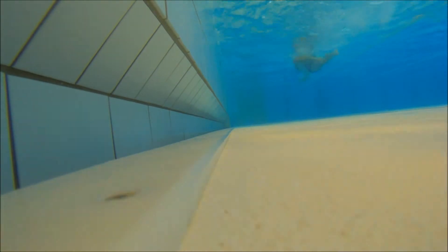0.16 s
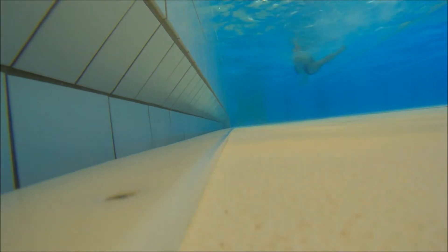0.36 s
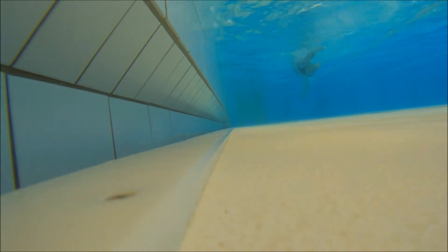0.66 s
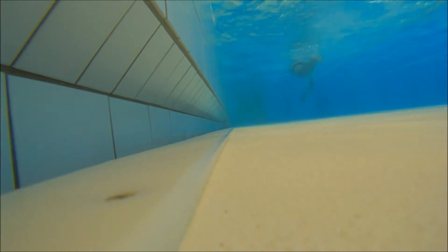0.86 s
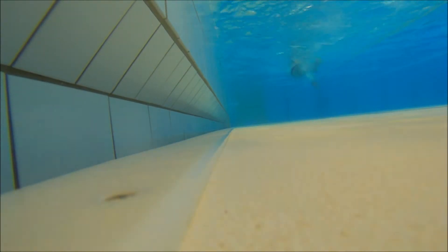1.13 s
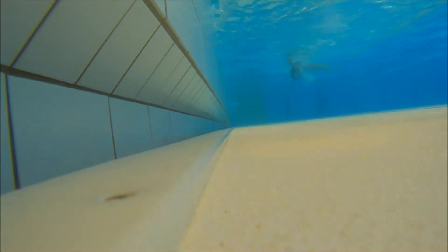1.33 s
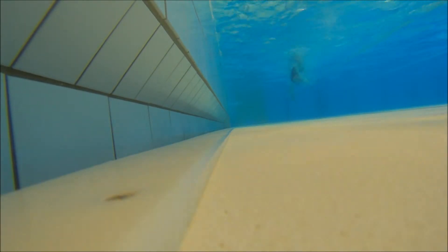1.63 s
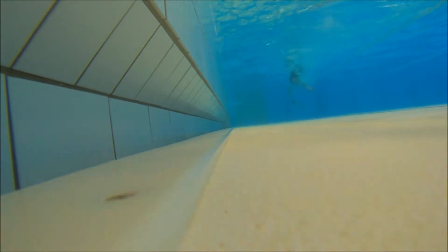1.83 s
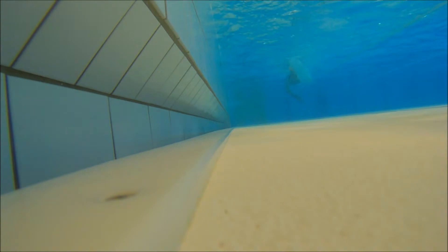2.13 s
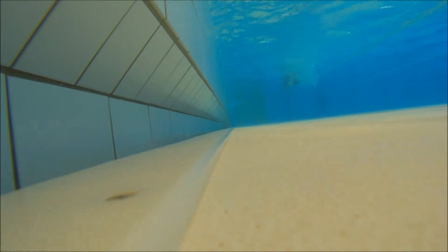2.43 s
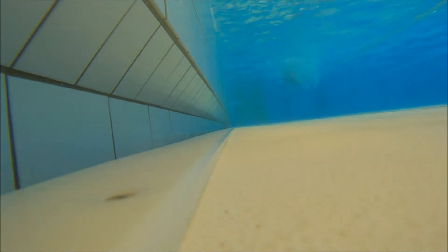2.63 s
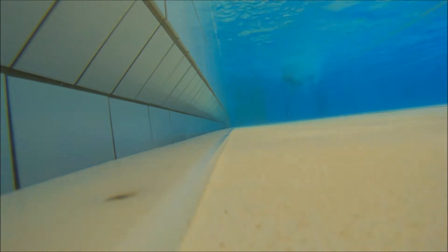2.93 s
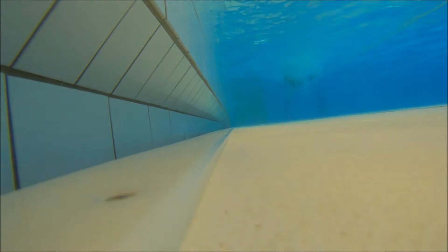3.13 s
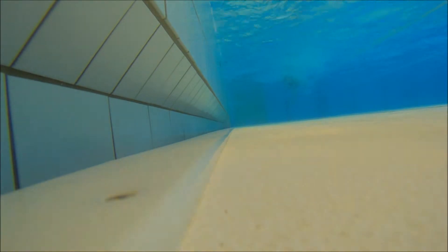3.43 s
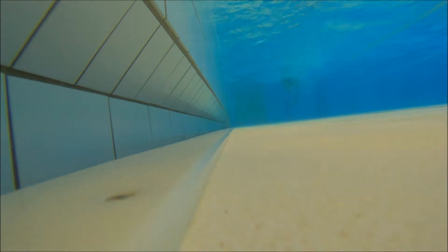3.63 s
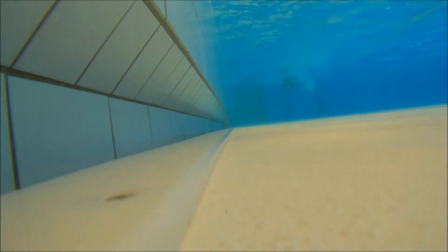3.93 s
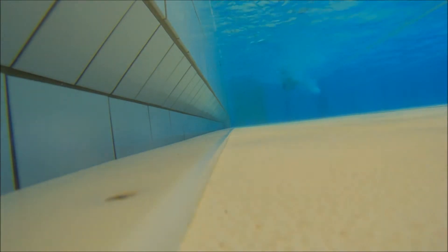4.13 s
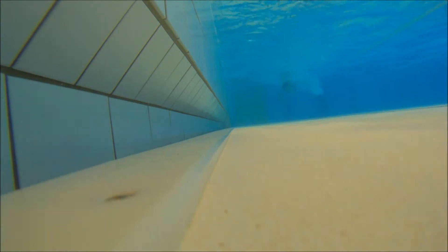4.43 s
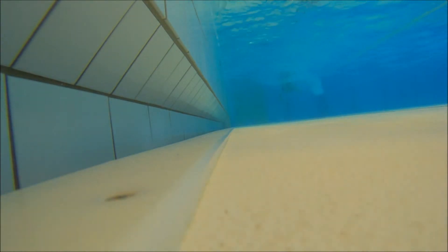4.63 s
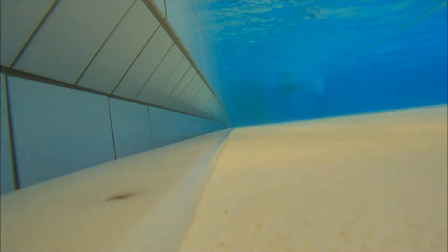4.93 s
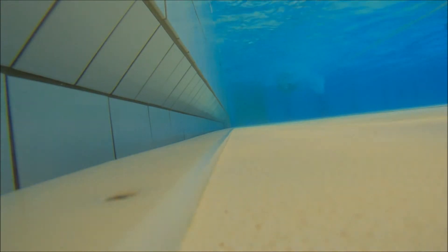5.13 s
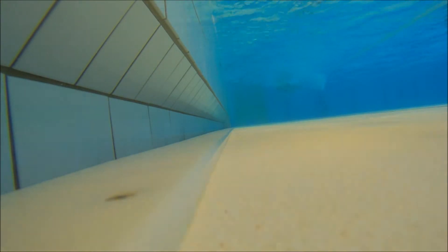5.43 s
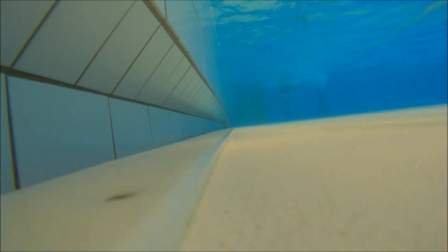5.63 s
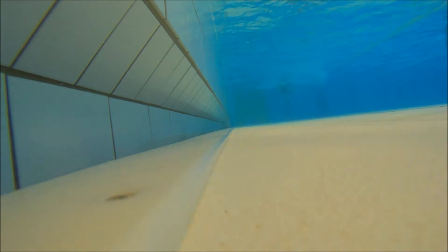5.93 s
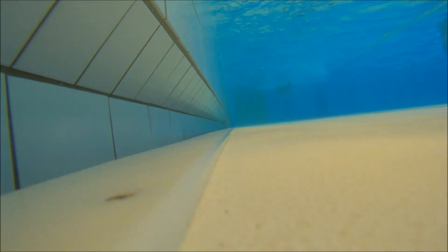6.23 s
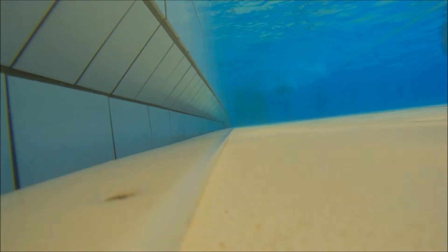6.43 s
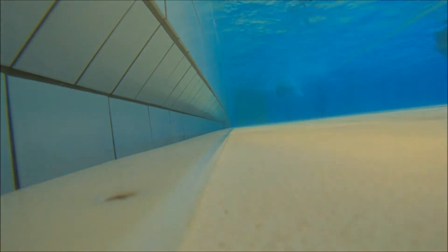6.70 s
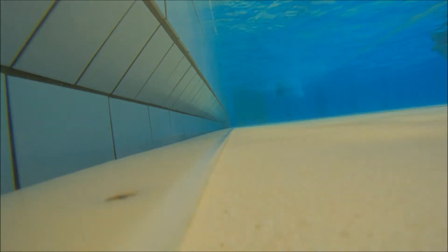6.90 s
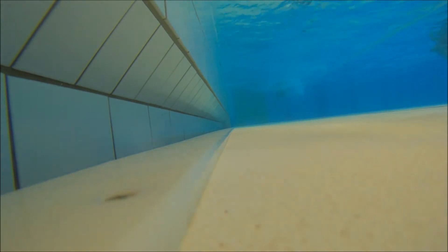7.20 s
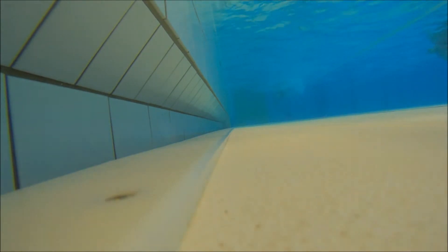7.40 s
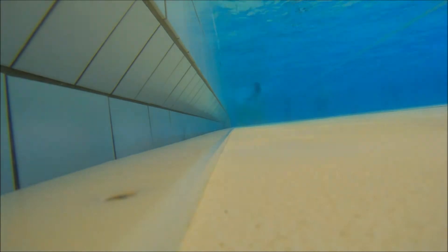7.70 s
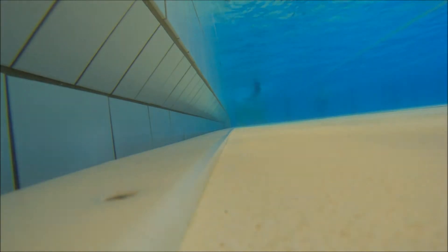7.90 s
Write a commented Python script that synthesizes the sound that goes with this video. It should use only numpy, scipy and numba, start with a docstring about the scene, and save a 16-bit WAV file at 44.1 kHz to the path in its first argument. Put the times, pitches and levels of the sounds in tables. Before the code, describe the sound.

A muffled, bubbly wash and low rumble fill an indoor pool, picked up underwater by a microphone in a waterproof case. A pump's even hum and thin, wavering whine run beneath it all. A far-off swimmer stirs gentle swells, gurgles and a few deep surges, calming slightly over time, while tiny bubbles fizz faintly and tick close by. There is one very brief dropout just before the end.

```python
"""Under water at the bottom of an indoor pool, heard through a waterproof case.
A circulation pump hums and its motor whines over the turbulent rumble and rush of the return flow.
A distant swimmer stirs up gurgles and slow surges. Bubbles ring as damped oscillators, and the
tiniest fizz and tick against the resonant case. The treble of the fizz dips briefly here and there,
and the sound cuts out for an instant near the end."""
import sys
import numpy as np
from scipy import signal
from scipy.fft import rfft, irfft
from scipy.io import wavfile
from numba import njit

SR = 44100
rng = np.random.default_rng(int(sys.argv[2]) if len(sys.argv) > 2 else 0)


def transcribe(u):
    """Save the signal u as a 16-bit wav file named by the first command-line argument.

    u: samples, shape (n,) or (channels, n), limited to [-1, 1]; the rate is SR.
    q: integer samples, one column per channel.
    """
    v = np.clip(np.atleast_2d(u).T, -1, 1)
    q = np.round(v * 32767).astype(np.int16)
    wavfile.write(sys.argv[1], SR, q)


N = 355446
T = np.arange(N) / SR


def undb(db):
    """Amplitude ratio of a level in decibels."""
    return 10 ** (np.asarray(db) / 20)


def unit(x):
    """Normalisation to an rms of 1."""
    return x / np.sqrt(np.mean(x ** 2))


def walk(rate):
    """Band-limited random fluctuation of spread 1, changing about rate times a second."""
    steps = rng.standard_normal(int(2 * rate * N / SR) + 4)
    smooth = signal.resample(steps, 8 * len(steps))
    return np.interp(T, np.arange(len(smooth)) / (16 * rate), smooth)


def bumps(rows):
    """Gaussian changes of level in dB, one around each row's moment."""
    return sum(db * np.exp(-((T - s) / half_length) ** 2) for s, db, half_length in rows)


def colour(x, points, size=8192):
    """Minimum-phase filtering by a (Hz, dB) spectrum that falls 20 dB an octave past its last point."""
    hz, db = np.transpose(points)
    grid = np.maximum(np.arange(size // 2 + 1) * SR / size, 1)
    octaves_beyond = np.maximum(np.log2(grid / hz[-1]), 0)
    gain_db = np.interp(np.log(grid), np.log(hz), db) - 20 * octaves_beyond
    cepstrum = irfft(np.log(undb(gain_db)))
    cepstrum[1:size // 2] *= 2  # folding the cepstrum makes the response causal
    cepstrum[size // 2 + 1:] = 0
    response = irfft(np.exp(rfft(cepstrum)))
    return signal.fftconvolve(x, response)[:N]


def split(x, edges_hz):
    """Fourier decomposition into adjoining bands."""
    band = np.searchsorted(edges_hz, np.arange(N // 2 + 1) * SR / N)
    spectrum = rfft(x)
    return [irfft(spectrum * (band == k), N) for k in range(len(edges_hz) + 1)]


def tone(hz, waver):
    """Amplitude modulation: a machine tone wavers, as its echo from the rippling surface makes it do."""
    return unit((1 + waver * walk(2.5)) * np.sin(2 * np.pi * (hz * T + rng.random())))


# The whine and its sidebands. Each row: offset in multiples of the shaft rate, relative level in dB.
WHINE_PARTIALS = [(-2, -62), (-1, -50.6), (0, -48.2), (1, -53)]

def whine(centre_hz=890.5, shaft_hz=24.65):
    """Modulation sidebands make the motor's whine half throb, half wobble once each turn of the shaft."""
    out = np.zeros(N)
    for k, db in WHINE_PARTIALS:
        phase = 2 * np.pi * (centre_hz + k * shaft_hz) * T + k ** 2 * np.pi / 4
        out += undb(db) * unit((1 + .1 * walk(3)) * np.sin(phase))
    return out


# Course of the impeller's hum. Each row: time in seconds, level in dB.
HUM_LEVELS = [(0, -37.5), (.8, -37), (1.08, -36), (1.3, -37), (2.8, -36), (3.45, -39.5), (4.9, -37.5),
              (6.3, -38.5), (7.1, -38), (8.06, -37.5)]
# Tones of motor and mains. Each row: frequency in Hz, relative level in dB.
MOTOR_TONES = [(74, -55), (100, -57), (145, -57), (290, -61.5), (300.1, -61), (590.1, -57.5), (682.3, -59),
               (766, -60), (790.4, -56), (882.5, -55.5)]
# Thin whistle of the motor drive. Each row: frequency in Hz, level in dB.
DRIVE_TONES = [(3452, -84), (9816, -81), (9846, -78)]

def pump(blade_hz=147.9):
    """Periodic forcing: the pipes carry a hum at the blade rate, with the tones of motor and drive."""
    hum = tone(blade_hz, waver=.074) * undb(np.interp(T, *np.transpose(HUM_LEVELS)))
    motor = sum(undb(db) * tone(hz, waver=.1) for hz, db in MOTOR_TONES)
    whistle = sum(undb(db) * tone(hz, waver=1) for hz, db in DRIVE_TONES)
    motor_gain_db = -1.6 + .5 * T
    return hum + (motor + whine()) * undb(motor_gain_db) + whistle


# Spectrum of the basin's rumble. Each row: frequency in Hz, relative spectral density in dB.
RUMBLE_SPECTRUM = [(8, 7), (20, 2.5), (35, -11), (50, -2.5), (62, -0.5), (76, 3), (95, 2.5), (115, -6.5),
                   (138, 2), (165, -4), (215, -5.5), (260, -13.5), (400, -31)]

def rumble():
    """Turbulence fills the basin with low, random pressure fluctuations."""
    turbulence = unit(colour(rng.standard_normal(N), RUMBLE_SPECTRUM))
    return turbulence * undb(-39 + .97 * walk(1.4))


@njit
def ring(starts, hz, sizes, decay_s):
    """Superposition of damped oscillations, one for each bubble."""
    out = np.zeros(N)
    for k in range(len(starts)):
        phasor = sizes[k] / np.sqrt(decay_s[k]) + 0j
        pole = np.exp((2j * np.pi * hz[k] - 1 / decay_s[k]) / SR)
        for i in range(starts[k], min(N, starts[k] + int(6 * decay_s[k] * SR))):
            out[i] += phasor.imag
            phasor *= pole
    return out


def bubbles(low_hz, high_hz, cycles, spread_db, count):
    """Shot noise: bubbles, many faint and a few strong, ring at random and fall to 1/e in cycles periods."""
    when, pitch, strength, sign = rng.random((count, 4)).T
    hz = low_hz + (high_hz - low_hz) * pitch
    level_db = spread_db * np.minimum(-np.log(1 - strength), 5)
    sizes = undb(level_db) * np.sign(sign - .5)
    return unit(ring((when * N).astype(np.int64), hz, sizes, cycles / hz))


# Spectrum of the bubbly rush. Each row: frequency in Hz, relative spectral density in dB.
RUSH_SPECTRUM = [(150, -27), (260, -6.5), (320, -3), (500, -4), (595, 0.5), (700, -2), (850, 1), (960, 5),
                 (1025, -3), (1075, 0.5), (1320, -9), (1490, -8.5), (1700, -24.5), (2500, -55)]
# The swimmer's strokes. Each row: time of the peak in seconds, rise of the rush in dB.
SWIM_STROKES = [(-.14, 5), (.36, 0), (1.07, 2.2), (1.82, 0), (2.34, 1.5), (2.84, 2), (3.58, 1), (4.35, 1.6),
                (4.8, 1.5), (5.2, 0), (7.3, 0.5)]

def rush(stroke_half_length_s=.099):
    """Incoherent addition: countless ringing bubbles merge into a rush that swells with the strokes."""
    churn = rng.standard_normal(N) + .4 * bubbles(250, 2400, cycles=9, spread_db=1.6, count=7000)
    slosh, wash = split(unit(colour(churn, RUSH_SPECTRUM)), edges_hz=[755])
    slosh *= undb(-.12 * (T - T.mean()))  # the low part dies down sooner
    calming_db = -37 - .29 * T  # the swimmer moves away
    strokes_db = bumps([(*row, stroke_half_length_s) for row in SWIM_STROKES])
    return (slosh + wash) * undb(calming_db + strokes_db + .17 * walk(7.1))


# Resonances of the case. Each row: frequency in Hz, relative gain in dB.
CASE_SPECTRUM = [(1300, -23), (1750, -7), (2080, -2.5), (2500, -15), (3200, -14.5), (4600, -13),
                 (5100, -8.5), (5750, 0), (6200, -4.5), (6700, -1), (7300, -11.5), (8000, -12.5),
                 (9700, -10.5), (11500, -20.5), (13000, -18.5)]
# Boundaries between classes of bubble size. Each entry: frequency in Hz.
SIZE_EDGES_HZ = [2600, 5000, 6200, 7300, 11000]
# Flurries of fine bubbles. Each row: time in seconds, change of level in dB, half length in seconds.
FIZZ_FLURRIES = [(.06, 3, .078), (.51, 2.5, .087), (1.2, 2, 0.11), (1.82, 1.5, 0.045), (2.05, 3, .14),
                 (2.5, 1, 0.25), (2.9, -1, .06), (3.23, 1.5, 0.089), (3.78, 3, 0.091), (4.16, 1.5, .069),
                 (4.57, 0.5, 0.034), (4.97, 2.5, 0.21), (5.52, 3, 0.048), (5.79, 2, .087), (6.53, 2, 0.11),
                 (6.92, 1.5, 0.31), (7.57, 3, 0.11), (7.92, 1, 0.19)]

def fizz(flicker_db=1.15):
    """Forced resonance: flurries of fine bubbles ring the case, each size flickering on its own."""
    fine = bubbles(1500, 14000, cycles=11, spread_db=2.6, count=22000)
    finest = bubbles(7000, 14000, cycles=14, spread_db=2.8, count=6000)
    coarse = bubbles(1500, 7000, cycles=40, spread_db=2.1, count=2000)
    crackle = rng.standard_normal(N) + .62 * fine + .42 * finest + .31 * coarse
    bands = split(colour(crackle, CASE_SPECTRUM), SIZE_EDGES_HZ)
    flickering = sum(band * undb(flicker_db * walk(14)) for band in bands)
    level_db = -50.5 - .34 * T + bumps(FIZZ_FLURRIES)
    return unit(flickering) * undb(level_db)


# Brief dips of the fizz. Each row: time in seconds, change of level in dB, half length in seconds.
FIZZ_DIPS = [(.189, -14, 0.015), (.348, -21, .015), (1.587, -26, .008), (1.924, -10, 0.0083),
             (2.757, -24, 0.013), (3.05, -34, 0.019), (3.907, -23, 0.0077), (4.284, -12, 0.0073),
             (6.362, -15, 0.0085), (7.385, -18, 0.011)]

def treble_dips(x, case_ring_hz=(5200, 7000)):
    """Selective attenuation: the treble dips for an instant, except in the band where the case rings."""
    bandpass = signal.butter(4, case_ring_hz, "bandpass", fs=SR, output="sos")
    ringing = signal.sosfiltfilt(bandpass, x)
    return ringing + (x - ringing) * undb(bumps(FIZZ_DIPS))


def wave_packets(rows, rise, count):
    """Clouds of count random tones under Gaussian envelopes; pitch climbs by the share rise a half length."""
    out = np.zeros(N)
    for s, hz, db, half_length, spread in rows:
        span = np.abs(T - s) < 2 * half_length
        offset = T[span] - s
        pitches = hz * (1 + spread * np.clip(rng.standard_normal((count, 1)), -2, 2))
        glide = offset + rise * offset ** 2 / (2 * half_length)
        cloud = np.sin(2 * np.pi * (pitches * glide + rng.random((count, 1)))).sum(axis=0)
        swell = np.exp(-(offset / half_length) ** 2)
        out[span] += undb(db) * unit(cloud * swell) * np.sqrt(np.mean(swell ** 2))
    return out


# Small bubbles bursting close by. Each row: time in seconds, centre frequency in Hz, level in dB.
BURSTS = [(.258, 5030, -45), (.867, 8500, -47), (1.195, 7500, -47), (1.217, 9000, -49), (1.298, 9200, -48),
          (1.988, 8450, -44), (3.197, 8350, -46), (4.358, 8200, -46), (4.569, 6140, -47),
          (5.088, 8900, -49), (5.506, 9000, -52), (6.323, 10100, -49), (6.931, 9500, -49),
          (7.02, 6000, -46.5), (7.137, 6400, -45.5), (7.479, 6950, -46), (7.723, 10000, -49),
          (8.013, 9500, -50)]

def ticks(half_length_s=.002, spread=.22):
    """A short pulse has a broad spectrum: each bursting bubble gives a bright tick."""
    return wave_packets([(*row, half_length_s, spread) for row in BURSTS], rise=0, count=48)


# Lone bubbles. Each row: start in seconds, frequency in Hz, level in dB before the envelope,
# decay time in seconds.
LONE_BUBBLES = [(.328, 700, -33, .014), (.35, 2180, -52, 0.014), (.606, 6080, -30.5, .005),
                (.67, 3930, -47, .006), (.95, 1630, -43, .011), (1.045, 2020, -49, .016),
                (1.229, 6740, -30.5, 0.0027), (1.497, 2060, -50, .01), (1.589, 5500, -35, 0.0046),
                (1.921, 6000, -42, .007), (2.355, 1930, -52, .016), (2.683, 1930, -49, 0.015),
                (2.742, 613, -32.5, .022), (2.801, 1620, -46, .012), (3.02, 1920, -53, .02),
                (3.05, 592, -32.5, 0.012), (3.582, 2060, -50, .012), (4.205, 1950, -46, .01),
                (5.729, 1870, -50, .012), (6.366, 503, -31.5, .014), (6.795, 2110, -38, 0.0067),
                (7.051, 640, -31, 0.016), (7.564, 1690, -47, .009)]

def blips(attack_s=.0029, rise_per_decay=.013):
    """Damped free oscillation: a bubble pinches off, rings and dies away, rising a little in pitch."""
    out = np.zeros(N)
    for s, hz, db, decay in LONE_BUBBLES:
        span = (T > s) & (T < s + 8 * decay)
        age = T[span] - s
        envelope = (1 - np.exp(-age / attack_s)) * np.exp(-age / decay)
        phase = 2 * np.pi * hz * age * (1 + rise_per_decay * age / (2 * decay))
        out[span] += np.sqrt(2) * undb(db) * envelope * np.sin(phase)
    return out


# Bubble clusters. Each row: time of the peak in seconds, centre frequency in Hz, level in dB,
# half length in seconds, spread as a share of the frequency.
CLUSTERS = [(.333, 686, -37.5, 0.03, 0.2), (.5, 1290, -49, .13, 0.11), (.57, 5750, -50, 0.096, .05),
            (1.03, 519, -42.5, 0.095, 0.27), (1.75, 600, -42, 0.036, 0.16), (1.82, 925, -41, 0.061, 0.053),
            (2.05, 1250, -56, 0.12, .12), (2.35, 602, -43, 0.22, 0.25), (2.69, 1940, -54, .019, .06),
            (2.755, 702, -44, .027, 0.19), (3.0, 1950, -55, .038, 0.053), (3.062, 836, -34, .012, 0.22),
            (3.275, 365, -39, 0.022, 0.11), (3.85, 579, -44, 0.3, 0.27), (4.5, 588, -36.5, 0.034, 0.129),
            (5.22, 896, -36, .035, 0.056), (5.47, 520, -40.5, .033, 0.082),
            (6.768, 1276, -41.5, .017, 0.095), (7.062, 684, -36, .018, 0.13), (7.09, 1437, -52, .05, 0.13),
            (7.54, 1590, -48, .035, 0.19)]

def gurgles():
    """Beating among bubble resonances: a narrow spread of pitches gurgles, a broad one sloshes."""
    return wave_packets(CLUSTERS, rise=.0185, count=48)


# Heaves of stirred water. Each row: time of the peak in seconds, centre frequency in Hz, level in dB,
# half length in seconds.
HEAVES = [(0.882, 61, -37, .13), (1.6, 42, -34, .07), (5.102, 30.2, -40, 0.16), (5.482, 30, -41, .13),
          (6.22, 72, -44, .15), (7.02, 80, -41, .13), (7.4, 78, -41, .12), (7.684, 80, -44.5, 0.12)]

def surges(spread=.283):
    """Slow displacement of water makes low-frequency pressure swells."""
    return wave_packets([(*row, spread) for row in HEAVES], rise=0, count=16)


def scene():
    """Linear superposition: the pressures of pump, water and bubbles add at one point."""
    background = pump() + rumble() + rush()
    stirring = gurgles() + surges() + blips()
    return (background + stirring + treble_dips(fizz()) + ticks())[None]


def record(dry, gap_start_s=7.79, gap_end_s=7.8227, top_hz=13850):
    """Gating and band limiting: the sound cuts out for an instant, and the highest treble is removed."""
    gate = (T < gap_start_s) | (T > gap_end_s)
    lowpass = signal.ellip(10, .2, 70, top_hz, fs=SR, output="sos")
    return signal.sosfilt(lowpass, dry * gate)


dry = scene()
out = record(dry)
transcribe(out)
```